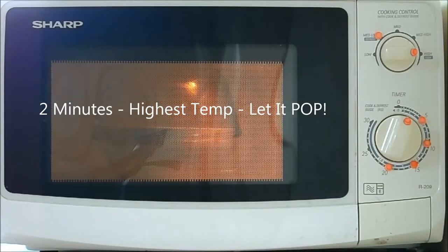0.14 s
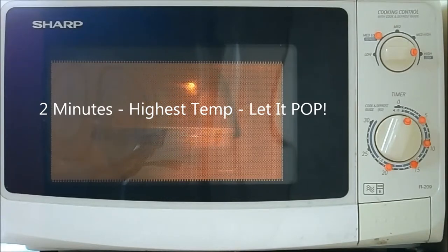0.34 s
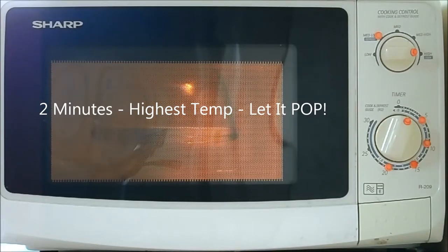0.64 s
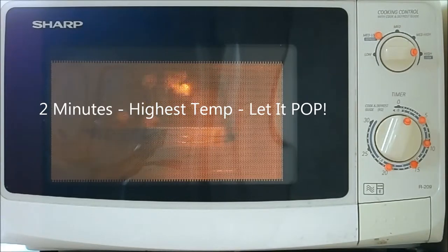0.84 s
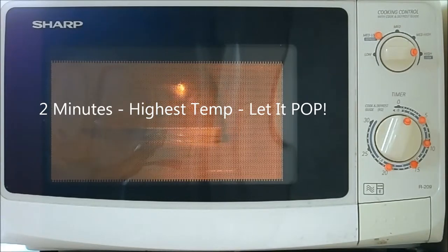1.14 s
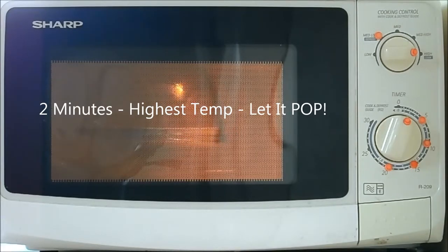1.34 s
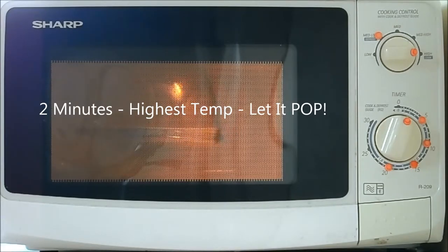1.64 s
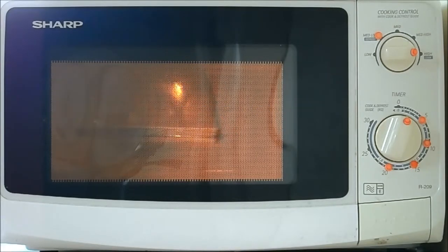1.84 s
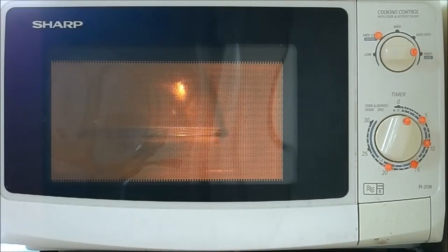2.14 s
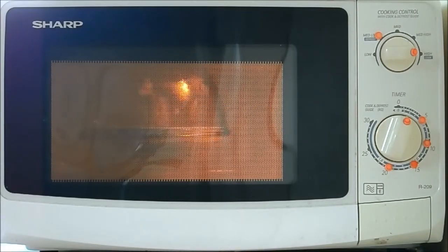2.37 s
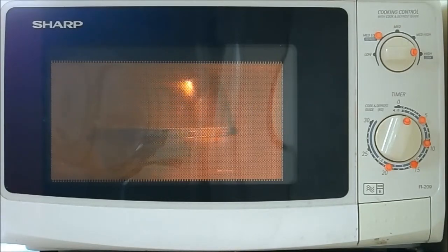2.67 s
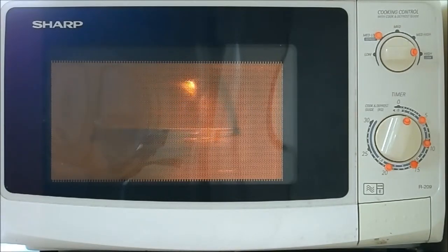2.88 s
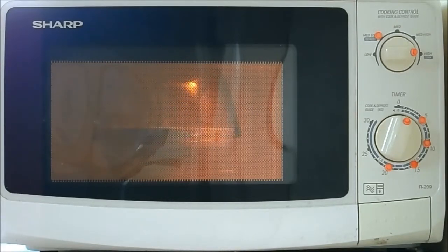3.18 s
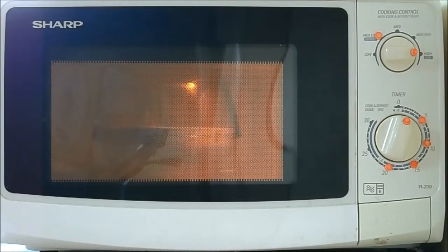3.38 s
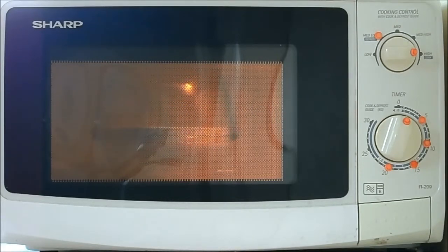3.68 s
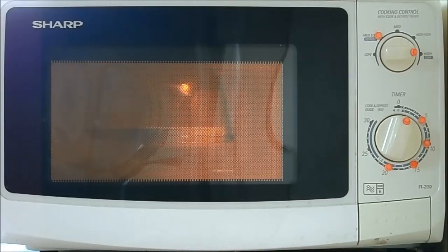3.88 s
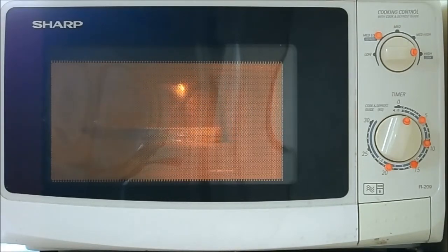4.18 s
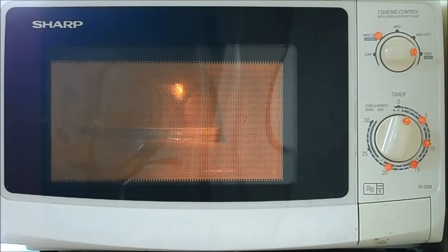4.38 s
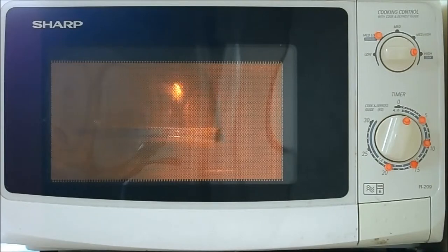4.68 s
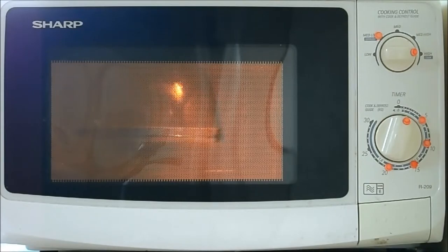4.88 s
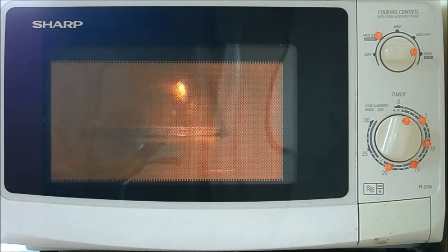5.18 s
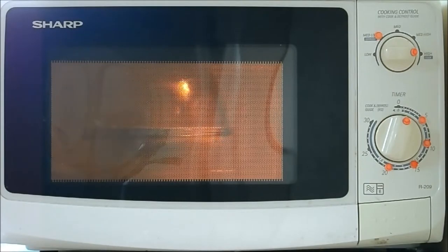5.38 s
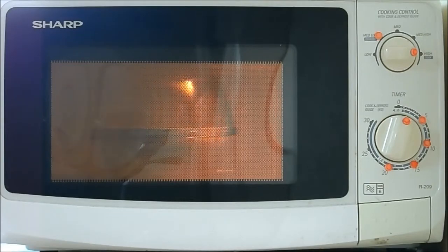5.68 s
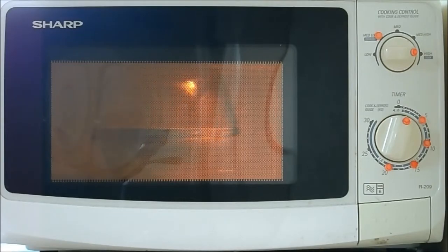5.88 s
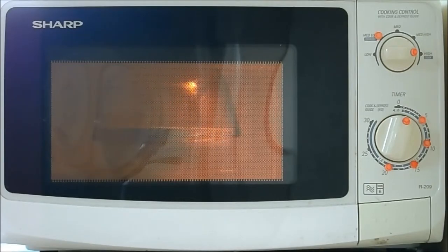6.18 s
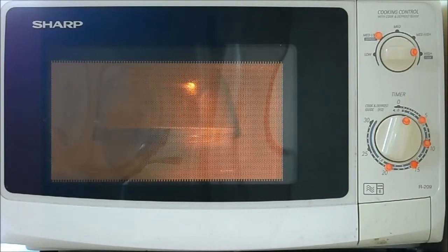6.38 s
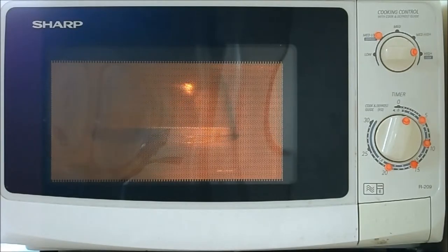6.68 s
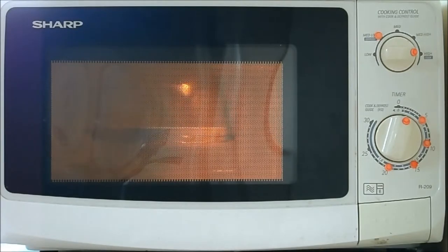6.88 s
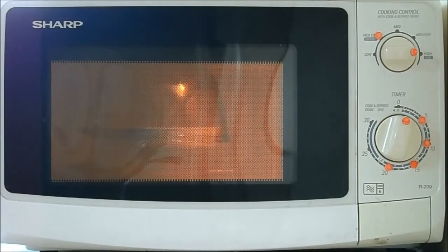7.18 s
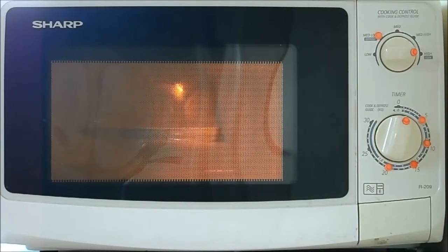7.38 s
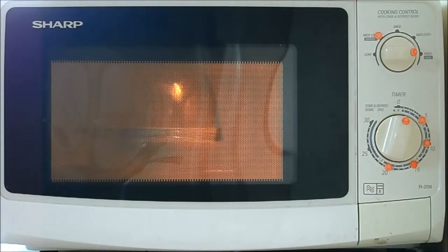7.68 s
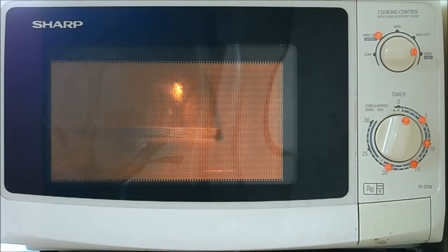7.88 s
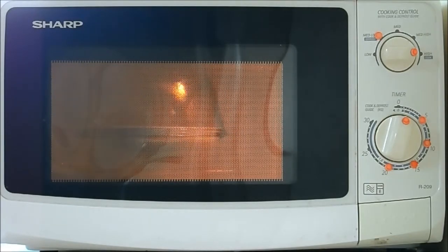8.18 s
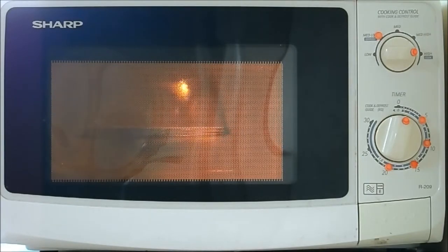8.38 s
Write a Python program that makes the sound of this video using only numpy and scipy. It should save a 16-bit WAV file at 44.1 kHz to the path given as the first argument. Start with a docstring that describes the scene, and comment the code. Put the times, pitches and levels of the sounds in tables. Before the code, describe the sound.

Heard close to the door of a kitchen microwave, popcorn bursts in a covered glass bowl, a few pops a second with short uneven gaps. The pops are soft and boxy, with brief high hisses and occasional faint ticks on glass. Under them the fan whirs, air blows through the vents and the oven hums without a break. Midway come a few quiet thuds and a faint low drone.

```python
"""Popcorn bursts in a covered glass bowl inside a running microwave oven, heard close to the door.
Each burst rings the oven's air modes and spits steam, of which only a few high bands pass the door;
now and then a kernel falls back and ticks on the glass. Underneath, the fan sings at its blade rate
and blows through the vents, and the transformer hums on the mains. A few dull thuds and a faint
low drone come about halfway through."""
import sys
import numpy as np
from scipy import signal
from scipy.fft import rfft, irfft
from scipy.io import wavfile
from scipy.ndimage import uniform_filter1d

SR = 44100
rng = np.random.default_rng(int(sys.argv[2]) if len(sys.argv) > 2 else 0)


def int16_out(signal):
    """Quantize to a 16-bit WAV file."""
    q = np.round(np.clip(np.atleast_2d(signal).T, -1, 1) * 32767)
    wavfile.write(sys.argv[1], SR, q.astype(np.int16))


N = 376173
TIME = np.arange(N) / SR
HIT_TIME = TIME[:8192]  # time axis of one short hit

# bursting kernels: t/s, burst level/dB, burst tilt/(dB per octave), steam level before the door/dB,
# steam tilt/(dB per door band), steam lean towards the top of each band/dB
KERNELS = [(.0067, -45, -1.5, -60, -3, -9), (.24, -42.5, -2, -59, -1.5, -6), (.254, -47.5, -4, -56, 1.5, 5),
           (.3356, -43, -2.3, -59, 1, 8), (.9038, -45.5, -3, -57.5, 0, -4), (.9535, -59, -1, -63, 0, 0),
           (1.0634, -41.5, -0.5, -56.5, -1, 1), (1.1282, -46, -4, -52.5, 0, -4),
           (1.3132, -44, -1, -56, 1, -4), (1.3266, -53, 3, -62.5, 0, -2), (1.5335, -44.5, -2, -57, -5, 1),
           (1.5722, -41, -2, -58.5, -3, 5), (1.8319, -40.5, -2, -50.5, 5, -2),
           (1.9207, -43, -1.5, -55.5, 12, -4), (2.4482, -51.5, -7, -59, 2, -1),
           (2.8362, -45.5, -3.6, -56, -1, -1), (3.2012, -37.5, 0, -54, 4, -6),
           (3.2138, -38.5, 3, -47, 0, -9), (3.4012, -42.5, -4, -58, 1, 2), (3.8095, -38.5, 0, -53, 8, -4),
           (4.155, -41, -1, -59, 0, -1), (4.359, -48, -1.5, -70, -5.5, 0), (4.5176, -43, 1, -60, 3, -2),
           (4.5251, -45, -1, -55, 2, -4), (4.6797, -41, .6, -54, -3, 4), (5.365, -41.5, 0, -51, 4, 0),
           (5.8859, -41.5, -2.5, -57, -2, 5), (6.3264, -41.5, -2, -58, 0, 4),
           (6.5132, -40.5, 2.5, -63, -2, 0), (6.5546, -36, -0.5, -55, -6, 1),
           (6.626, -46.5, -4.5, -66, 3, 6), (7.326, -39, -1.2, -53, 2, 3),
           (7.3847, -39, 0.5, -56.5, -2.5, 4), (7.5371, -42.5, -3, -51, -0.5, 3),
           (8.3252, -47.5, -5, -63.5, -2, 5)]
# air modes of the oven with the bowl in it: f/Hz, relative level/dB, T60 before the heap damps it/s
OVEN_MODES = [(243, -23, 0.33), (308, -10.5, 0.061), (405, -19, 0.08), (440, -8, 0.014), (585, -13, 0.016),
              (616, -6, 0.075), (640, -11.7, 0.1), (688, 1, 0.039), (710, -25, 0.08), (840, 3.5, 0.025),
              (927, -16, 0.13), (936, -4.5, 0.081), (981, -8.5, 0.085), (1023, -11, 0.09),
              (1082, -18, 0.18), (1173, -13.5, 0.09), (1407, -19, 0.22), (2178, 4, 0.14)]
# bounces in the oven, cover to bowl and wall to wall: round trip/s, all-pass share (-1 to 1)
OVEN_BOUNCES = [(.0018, -0.63), (.0042, 0.66)]
# resonances in the three bands that pass the door: f/Hz, width/Hz, relative level/dB
LOW_BAND = [(6270, 37, -1.5), (6514, 300, -5.5), (6830, 98, -3), (6990, 140, 0.5), (7300, 93, -5)]
MIDDLE_BAND = [(10600, 50, 2), (10920, 290, -5), (11800, 310, -17)]
HIGH_BAND = [(13900, 150, 0), (14020, 180, 0), (14400, 450, -6), (14950, 600, -10), (12500, 8100, -23)]
# popped kernels landing on the glass: t/s, level/dB
GLASS_HITS = [(.259, -58), (1.591, -62), (3.222, -62), (4.746, -62), (6.381, -59), (6.564, -60)]
# modes of the glass bowl: f/Hz, relative level/dB, T60/s
BOWL_MODES = [(7480, 2, .11), (4700, -10, .06)]
# the fan's tones: multiple of the blade rate, relative level/dB
BLADE_HARMONICS = [(1, -63.5), (4, -44.5), (8, -62.5), (12, -63.5), (16, -65.5), (20, -76.5), (28, -70)]
# brief dips in those tones: t/s at the lowest point, gain/dB, half length/s
BLADE_DIPS = [(2.9, -1.3, .3), (5.3, -1, .14)]
# broad spectrum of the cooling air: f/Hz, relative level/dB
AIR_SPECTRUM = [(25.0, -24), (60.0, -19.5), (130.0, -21.5), (300.0, -12), (500.0, -21.5), (620.0, -3.5),
                (1350.0, -10.5), (1600.0, -20), (2200.0, 1), (3000.0, -13.5), (5500.0, -16),
                (8400.0, -20.5), (10000.0, -25.5), (15500.0, -28.5)]
# peaks and notches that the housing and vents put on the air: f/Hz, width/Hz, gain/dB
VENT_COLOUR = [(129.5, 22, 8), (440, 65, 8), (707, 33, 9), (776, 150, -12), (940, 49, -8), (1102, 37, 6),
               (1279, 127, 7), (1447.9, 82, 7), (1560, 42.3, 3.5), (1691, 54, 6), (1960, 78, -6.5),
               (2235, 226, -7), (2510, 60, -12), (2900, 51.3, -1.5), (3144, 155, 6.5), (3425, 50, 7),
               (3970, 63, 6.5), (4395, 84, 5), (4596, 88, 7), (4690, 85, -11.5), (4747, 70, 9.5),
               (5590, 65, 7), (5660, 230, -3), (6280, 310, -3), (6710, 150, 4), (7600, 159.2, 0.5),
               (8420, 80, 9), (9480, 120, 5), (10011.4, 156.5, 0), (12281.4, 212.4, 5.5)]
# steady hum of the transformer, motors and panels: f/Hz, level/dB
HUM_TONES = [(120, -71.5), (400, -61.9), (740, -69.5), (800, -68), (1200, -61.5), (1600, -82),
             (1800, -77.5), (2400, -73), (5800, -73), (6000, -88)]
# dull thuds: t/s, f/Hz, level before the soft attack/dB, T60/s
LOW_THUDS = [(4.335, 60, -54, .1), (4.522, 292, -54, 0.15), (4.583, 75.4, -46, 0.12),
             (4.586, 288, -53, .13), (4.619, 106, -47.5, 0.091)]


def popcorn(door_db=(0, -3, -3.5)):
    """Each kernel bursts and spits steam in three door bands; a sharper spit favours the higher ones."""
    out = np.zeros(N)
    for s, burst_db, tilt_db, steam_db, steam_tilt_db, lean_db in KERNELS:
        add(out, s, hit_level(burst(tilt_db), burst_db))
        for k, band in enumerate((LOW_BAND, MIDDLE_BAND, HIGH_BAND)):
            band_db = steam_db + door_db[k] + steam_tilt_db * (k - 1)
            add(out, s, hit_level(steam(band, lean_db), band_db))
    return out


def burst(tilt_db, contact_hz=1550, lowest_hz=115, heap_t60=0.65, scatter_db=2.5):
    """The hull splits: a soft pressure pulse rings the oven's air and bounces about inside."""
    ring = np.zeros(len(HIT_TIME))
    for mode_hz, db, t60 in OVEN_MODES:
        mode_db = db + scatter_db * rng.standard_normal()  # each kernel's place favours other modes
        ring += undb(mode_db - 60 * HIT_TIME / t60) * np.cos(2 * np.pi * mode_hz * HIT_TIME)
    ring *= undb(-60 * HIT_TIME / heap_t60)  # the heap of popcorn soaks up the ring
    ring = signal.sosfilt(signal.butter(5, contact_hz, fs=SR, output="sos"), ring)
    # a kernel is too small for bass
    ring = signal.sosfilt(signal.butter(2, lowest_hz, "high", fs=SR, output="sos"), ring)
    hz = bins(ring)
    octaves = np.clip(np.log2((hz + 1) / 750), -1, 2)
    response = undb(tilt_db * octaves)  # a quicker burst is brighter
    for trip_s, share in OVEN_BOUNCES:
        delay = np.exp(-2j * np.pi * hz * trip_s)
        response = response * (share + delay) / (1 + share * delay)  # smears the hit, keeps its colour
    return irfft(rfft(ring) * response)


def steam(resonances, lean_db, swell_s=0.0032, fade_s=0.014, sputter_db=1.5, scatter_db=2):
    """A sputtering spit of steam swells and dies; each kernel's place favours other resonances."""
    noise = rng.standard_normal(len(HIT_TIME))
    hz = bins(noise)
    colour = sum(undb(db + scatter_db * rng.standard_normal()) / (1 + (2 * (hz - centre) / width) ** 2)
                 for centre, width, db in resonances)
    middle_hz = np.median([row[0] for row in resonances])
    colour *= undb(lean_db * np.clip((hz - middle_hz) / 550, -1, 1))  # full lean 550 Hz either side
    flow = (1 - np.exp(-(HIT_TIME / swell_s) ** 2)) * np.exp(-HIT_TIME / (fade_s + swell_s / 2))
    sputter = undb(sputter_db * wander(SR / 250, size=len(flow)))
    return irfft(rfft(noise) * colour) * flow * sputter


def landings():
    """Light kernels fall back and tick against the glass bowl."""
    tick = sum(undb(db - 60 * HIT_TIME / t60) * np.sin(2 * np.pi * hz * HIT_TIME)
               for hz, db, t60 in BOWL_MODES)
    out = np.zeros(N)
    for s, db in GLASS_HITS:
        add(out, s, hit_level(tick, db))
    return out


def fan(blade_hz=170.5, drift_hz=0.1291, wobble_hz=0.0758, flutter_db=0.27, trim_db=.1):
    """The motor's speed drifts a little; the blade tones follow, flutter in turbulence and dip twice."""
    rate_hz = blade_hz + drift_hz * wander(SR / 2) + wobble_hz * wander(SR / 8)
    phase = 2 * np.pi * np.cumsum(rate_hz) / SR
    tones = np.zeros(N)
    for harmonic, db in BLADE_HARMONICS:
        level = undb(db + flutter_db * wander(SR / 30))
        tones += level * np.sin(round(harmonic) * phase + rng.uniform(0, 2 * np.pi))
    dips_db = sum(db * np.exp(-((TIME - s) / half_s) ** 2) for s, db, half_s in BLADE_DIPS)
    return np.sqrt(2) * tones * undb(trim_db + dips_db)


def vent_air(level_db=-49.0, ripple_db=1.85, surge_db=0.41):
    """A bed of turbulent air, coloured by the housing and rippled by reflections off counter and walls."""
    noise = rng.standard_normal(N)
    hz = bins(noise)
    points_hz, points_db = np.transpose(AIR_SPECTRUM)
    colour_db = np.interp(np.log(hz + 1), np.log(points_hz), points_db)
    colour_db += sum(db * .5 ** ((2 * (hz - centre) / width) ** 2) for centre, width, db in VENT_COLOUR)
    ripple = wander(40 * N / SR, size=len(hz))  # a new value every 40 Hz
    colour_db += ripple_db * np.minimum(hz / 5000, 1) * ripple
    rush = unit(irfft(rfft(noise) * undb(colour_db), N))
    return rush * undb(level_db + surge_db * wander(SR / 6))


def hum(waver_db=0.5):
    """Transformer, motors and panels hum at steady pitches, each wavering slowly in level."""
    tones = np.zeros(N)
    for hz, db in HUM_TONES:
        level = undb(db + waver_db * wander(SR / 3))
        tones += level * np.sin(2 * np.pi * hz * TIME + rng.uniform(0, 2 * np.pi))
    return np.sqrt(2) * tones


def thuds(attack_s=.005):
    """A few dull thuds, each one low tone with a soft attack and a short tail."""
    out = np.zeros(N)
    for s, hz, db, t60 in LOW_THUDS:
        envelope = undb(db - 60 * HIT_TIME / t60) * (1 - np.exp(-HIT_TIME / attack_s))
        add(out, s, np.sqrt(2) * envelope * np.sin(2 * np.pi * hz * HIT_TIME))
    return out


def drone(hz=70, level_db=-72.5, waver_db=2, start_s=4.0, attack_s=.3, hold_s=.42, release_s=.13):
    """A faint low tone swells, holds under the thuds and dies away."""
    since = TIME - start_s
    attack = np.clip(since / attack_s, 0, 1)
    release = np.clip(1 - (since - attack_s - hold_s) / release_s, 0, 1)
    level = undb(level_db + waver_db * wander(SR / 15))
    return np.sqrt(2) * attack * release * level * np.sin(2 * np.pi * hz * TIME)


def undb(db):
    """Decibels to gain."""
    return 10 ** (np.asarray(db) / 20)


def unit(x):
    """The same sound at rms 1."""
    return x / np.sqrt(np.mean(x ** 2))


def hit_level(x, db):
    """Set a hit's level by the rms of its first 30 ms."""
    head = x[:int(.03 * SR)]
    return x * undb(db) / np.sqrt(np.mean(head ** 2))


def add(out, s, x):
    """Mix a hit in at s seconds."""
    start = int(s * SR)
    out[start:start + len(x)] += x[:N - start]


def wander(step, size=N):
    """Smooth random modulation at rms 1: values held for step points, then slewed twice."""
    k = int(step)
    held = np.repeat(rng.standard_normal(size // k + 1), k)
    return unit(uniform_filter1d(uniform_filter1d(held, k), k)[:size])


def bins(x):
    """The frequency in Hz of each bin in the spectrum of x."""
    return np.arange(len(x) // 2 + 1) * SR / len(x)


def scene():
    """Popcorn over the oven's running bed, the same in both channels."""
    mono = popcorn() + landings() + fan() + hum() + vent_air() + thuds() + drone()
    return np.array([mono, mono])


def record(dry):
    """A steep high cut at 15750 Hz takes the very top off the mix."""
    return signal.sosfilt(signal.ellip(10, .1, 70, 15750, fs=SR, output="sos"), dry)


dry = scene()
out = record(dry)
int16_out(out)
```